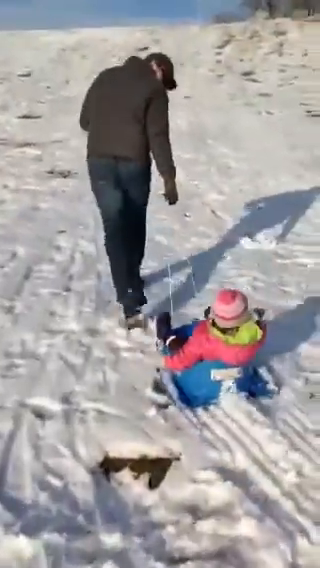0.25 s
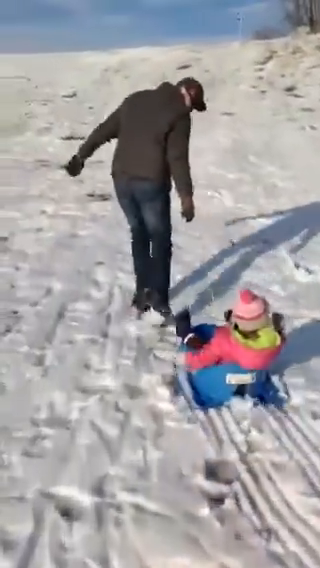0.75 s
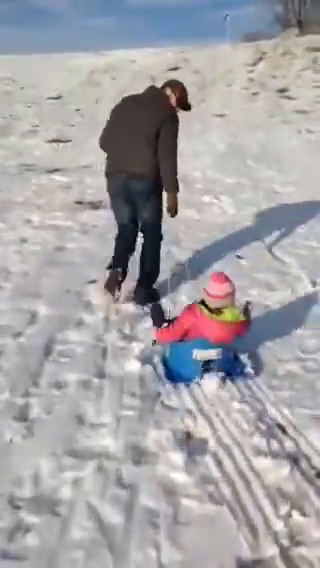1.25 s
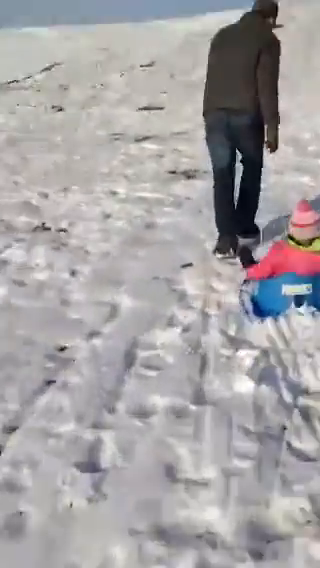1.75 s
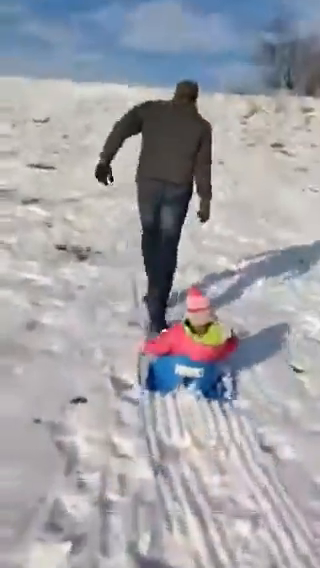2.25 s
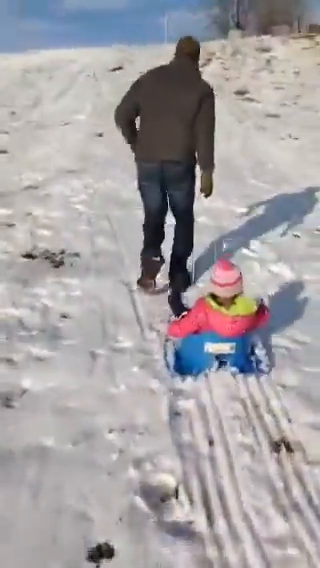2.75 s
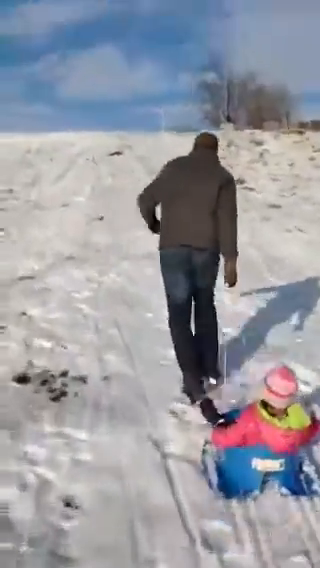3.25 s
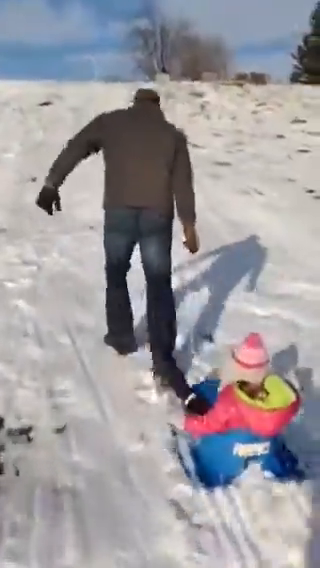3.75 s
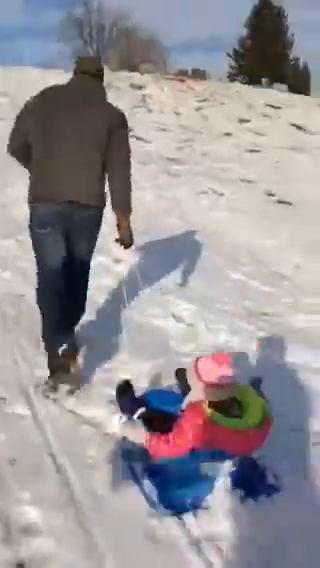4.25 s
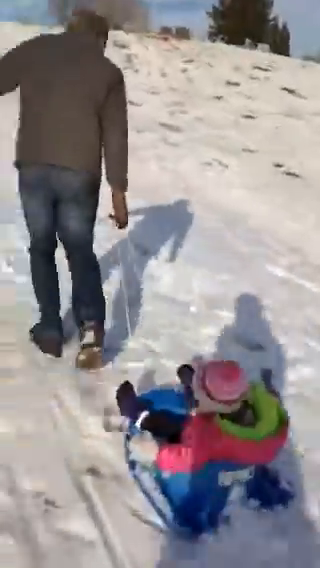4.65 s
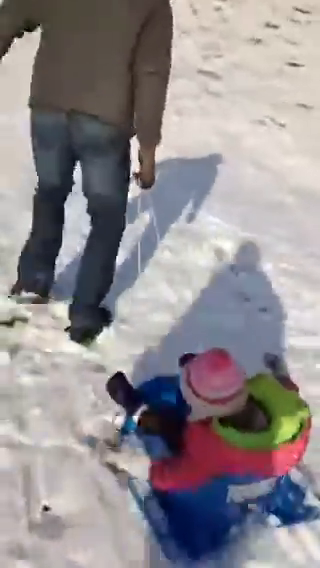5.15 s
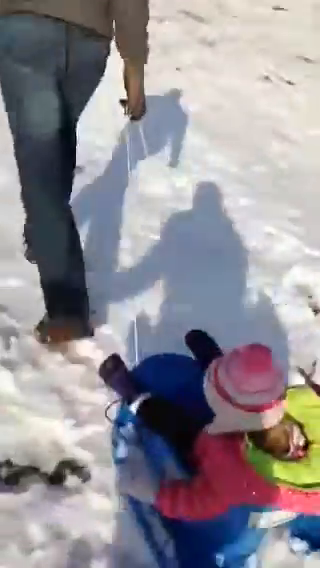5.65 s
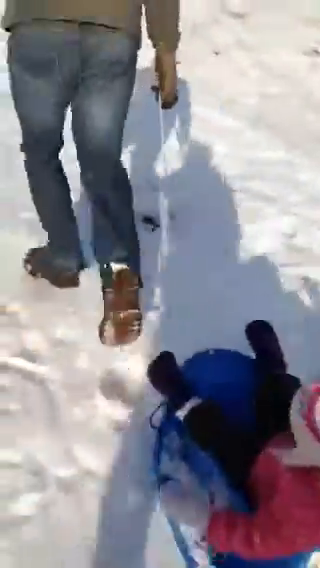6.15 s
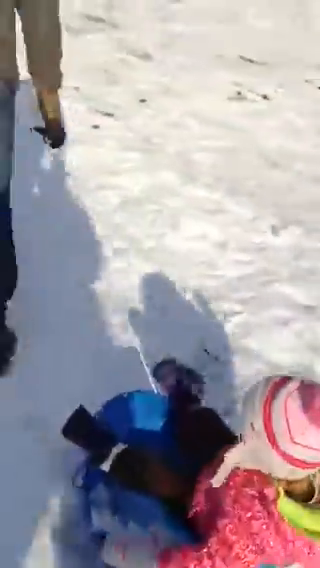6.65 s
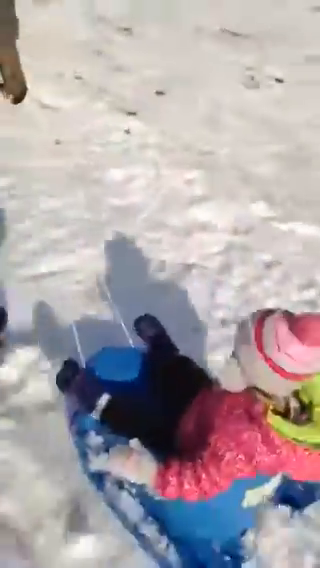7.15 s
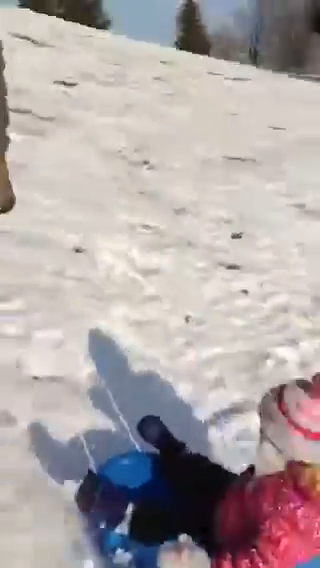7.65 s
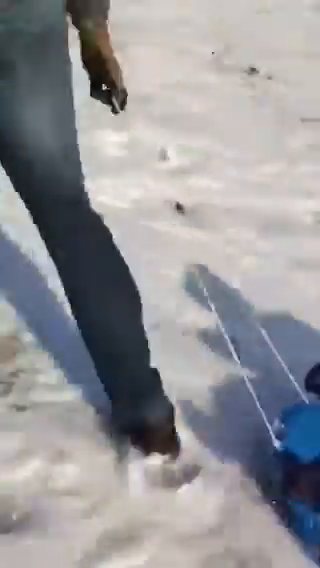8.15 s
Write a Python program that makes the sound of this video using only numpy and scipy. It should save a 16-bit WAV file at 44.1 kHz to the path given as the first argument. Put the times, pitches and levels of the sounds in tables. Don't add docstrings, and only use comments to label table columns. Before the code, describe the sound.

From 0 s a bright, grainy hiss of snow under a sliding plastic sled runs without a break, flickering with small tugs. A short crunch opens it, followed by soft low thuds and rumbling tread. At about 1 s a dull heel strike lands; from 1.5 to 2.7 s it is mostly hiss and hollow scrape with faint bumps. Firm crunching blows with hull knocks come near 2.8-3.0 and 3.6 s, then crusty cracks around 4.0 and 4.7 s. From 5 s the microphone is closer: the hiss swells and the hollow drone recedes. Heavy thuds, sharp crunches and plastic knocks cluster at 5.9, 6.2 and 6.6 s, then dense dull steps from 6.9 to 7.3 s. After 7.5 s the hiss eases slightly, with small crumbling clods and a last couple of boot steps at 8.1-8.4 s. Dry open air, centred handheld microphone, treble slightly limited.

```python
import sys
import numpy as np
from scipy import signal
from scipy.fft import rfft, irfft, next_fast_len
from scipy.io import wavfile
from scipy.ndimage import uniform_filter1d, minimum_filter1d

SR = 44100
rng = np.random.default_rng(int(sys.argv[2]) if len(sys.argv) > 2 else 0)


def voltage_ratio(decibels):
    exponent = np.asarray(decibels, float) / 20
    return 10 ** exponent


def pcm_store(signal):
    levels = np.round(np.clip(np.atleast_2d(signal), -1, 1) * 32767)
    wavfile.write(sys.argv[1], SR, levels.astype(np.int16).T)


N = 371322
T = np.arange(N) / SR


def evened(x):
    return x / np.sqrt(np.mean(x ** 2) + 1e-20)


def bell(u):
    return .5 ** ((2 * u) ** 2)


def add(mix, start_s, sound):
    part = mix[max(round(start_s * SR), 0):][:len(sound)]
    part += sound[:len(part)]


def along(points):
    return np.interp(T, *np.transpose(points))


def swells(table):
    t = np.arange(0, N, 64) / SR
    total = sum(db * bell((t - centre_s) / length_s) for centre_s, db, length_s in table)
    return np.interp(T, t, total)


def coloured(x, points):
    size = next_fast_len(len(x))
    point_hz, point_db = np.transpose(points)
    hz = np.fft.rfftfreq(size, 1 / SR)
    db = np.interp(np.log(hz + 1), np.log(point_hz + 1), point_db)
    return evened(irfft(rfft(x, size) * voltage_ratio(db), size)[:len(x)])


def resonate(x, hz, width_hz):
    turn = np.exp(2j * np.pi * np.cumsum(hz * np.ones(len(x))) / SR)
    r = np.exp(-np.pi * width_hz / SR)
    return 2 * (turn * signal.lfilter([1 - r], [1, -r], x / turn)).real


def wobble(ms):
    span = max(int(ms * SR / 1000), 2)
    return evened(uniform_filter1d(uniform_filter1d(rng.standard_normal(N), span), span))


def crystals(per_s, spread_db):
    size = voltage_ratio(spread_db * np.minimum(rng.exponential(1, N), 5))
    sign = rng.choice([-1., 1.], N)
    return size * sign * (rng.random(N) < per_s / SR)


def patchy(x, patch_db):
    z = signal.stft(x, nperseg=512)[2]
    patches = rng.standard_normal(z.T.shape).T
    patches = uniform_filter1d(uniform_filter1d(patches, size=8, axis=0), size=9, axis=1)
    return evened(signal.istft(z * voltage_ratio(patch_db * evened(patches)), nperseg=512)[1][:N])


def knock(db, hz, cycles, phase):
    half = int(2 * SR * cycles / hz)
    u = np.arange(-half, half) / SR * hz / cycles
    return voltage_ratio(db) * bell(u) * np.cos(2 * np.pi * (cycles * u + phase))


def blows(table, cycles):
    out = np.zeros(N)
    for centre_s, db, hz in table:
        sound = knock(db, hz, cycles, rng.random())
        add(out, centre_s - len(sound) / 2 / SR, sound)
    return out


# time in seconds, cancelled pitch in Hz.
ECHO_DIP = [
    (0.4, 8600),
    (1.2, 7900),
    (2., 7000),
    (5.8, 8500),
]


def ground_echo(x):
    depth = along([(0., 0.43), (3.2, 0.21), (5.3, 0.24), (6.7, 0.13), (7.2, .05)])
    return x - depth * resonate(x, along(ECHO_DIP), 1900.0)


# pitch in Hz, density in dB per Hz.
HISS = [(150, -2), (400, -11), (1000, -6), (2500, -2), (5000, -1), (7500, -1), (10000, -3.5), (16000, -12)]


def hiss():
    return ground_echo(patchy(coloured(crystals(per_s=14000., spread_db=2.0), HISS), patch_db=1.0))


# pitch in Hz, density in dB per Hz.
SPRAY = [(5000, -17.5), (8000, -7), (11000, -1.5), (13500, 1), (16000, -1.5)]


def spray():
    return ground_echo(patchy(coloured(crystals(per_s=16000., spread_db=1.4), SPRAY), patch_db=.5))


# pitch in Hz, width in Hz, level in dB.
HULL = [
    (780, 610, 3),
    (1100, 820, 5),
    (1500, 860, 3.5),
    (1914, 590, 2.5),
]


def drone():
    scrape = crystals(per_s=3000., spread_db=0.0)
    modes = [voltage_ratio(db) * resonate(resonate(scrape, hz, width_hz), hz, width_hz) for hz, width_hz, db in HULL]
    band = signal.butter(6, [680., 2250.], "band", fs=SR, output="sos")
    return evened(signal.sosfilt(band, evened(sum(modes))))


# pitch in Hz, density in dB per Hz.
RUMBLE = [(15, -37), (25, -11), (86, -2), (377, -3.5), (600, -4), (780, -10), (1320, -120)]
# time in seconds, level in dB.
TREAD = [
    (0., 8),
    (.9, 13),
    (1.7, 5),
    (2.4, -5),
    (4.3, 1),
    (5.3, -7),
    (6.1, -5),
    (7.2, -4),
    (7.5, -15),
    (8.42, -10),
]


def rumble(shift_db):
    lumps = resonate(crystals(per_s=160., spread_db=8.5), 85.0, 160.0)
    deep = evened(resonate(lumps, 130.0, 190.0))
    shake = coloured(crystals(per_s=1500., spread_db=2.5), RUMBLE)
    return shake + 0.18 * voltage_ratio(0.5 * shift_db + along(TREAD)) * deep


# time in seconds, hiss in dB, hull load in dB,
# powder in dB, ground shake in dB.
SLIDE = [(0.0, -45, -4.5, -1, -59.5), (0.7, -45, -3, -2, -56), (1.75, -47, -3, 1, -58),
         (1.95, -46, -0.5, 0.5, -63.5), (2.45, -46, 3, 1.5, -59.5), (2.75, -45.5, 1, 1, -57),
         (3.27, -43.5, 2.5, 0.5, -53.5), (3.33, -45, 0, 1.5, -59), (4.1, -43, -1.5, 0.5, -54),
         (5.0, -40.5, -13.5, 0.5, -57.5), (5.4, -37.5, -10, -2, -52), (5.7, -38, -11.5, -0.5, -54.5),
         (6.3, -38, -12, 1, -56), (6.8, -38, -4.5, 2.5, -42), (7.25, -38.5, -5, 2.5, -43.5),
         (7.5, -37, -9.5, 1.5, -58), (8.1, -41, -2.5, 4.5, -42.5), (8.42, -41.5, 0.5, -1, -59)]
# centre in seconds, change in dB, length in seconds.
TUGS = [(0.21, 2, 0.076), (0.48, -2.5, 0.12), (0.75, -2, 0.055), (0.96, -2, 0.064), (1.12, 3, 0.086),
        (1.34, -0.5, 0.38), (1.47, 1.5, 0.076), (1.54, 1, 0.04), (2.01, -1.5, 0.063), (2.11, 2.5, 0.076),
        (2.49, -0.5, 0.056), (2.61, 2, 0.037), (3.31, -3.5, 0.065), (3.41, 1, 0.07), (2.85, 1.5, 0.055),
        (3.12, -1, 0.077), (3.63, 1.5, 0.072), (3.83, -0.9, 0.13), (4.2, 1, 0.2), (4.77, 1, .06),
        (5.13, -1, .06), (5.22, -0.8, 0.14), (5.31, -1.5, 0.066), (5.52, -1.5, 0.04), (5.9, -2.5, 0.07),
        (6.09, 1.3, 0.32), (6.46, 3, 0.07), (6.64, -0.5, 0.17), (6.74, 2.5, 0.065), (6.8, 2.5, 0.12),
        (6.99, -1, 0.055), (7.17, 3.5, 0.059), (7.3, 1.5, 0.14), (7.53, -2, 0.09), (7.63, 0.5, .08),
        (7.71, 2, 0.055), (7.84, -1.5, 0.042), (8.0, 2.5, 0.088), (8.16, 1.5, 0.057), (8.3, -0.5, 0.099)]
# centre in seconds, change in dB,
# length in seconds.
JOLTS = [(0.57, 4.5, 0.046), (1.14, 1, 0.04), (1.0, 3.5, 0.073), (1.44, 3, 0.044), (1.71, 2, 0.066),
         (2.1, 1, 0.15), (2.81, 1, 0.04), (2.96, 1.5, 0.032), (3.61, 3, 0.062), (3.97, 4, 0.1),
         (3.84, 1, 0.14), (4.66, 6, 0.16), (4.77, 4, 0.12), (5.15, 1, 0.11), (5.44, 5, 0.097),
         (5.87, 7.5, 0.066), (6.2, 9, 0.063), (6.43, -9, 0.032), (6.58, -1, 0.046), (6.7, -12, 0.033),
         (6.89, -2, 0.033), (7.05, -2, 0.045), (7.83, -1, 0.063), (7.25, -2, 0.027), (7.99, 1.5, 0.058),
         (8.29, 2, 0.16)]
# centre in seconds, change in dB, length in seconds.
SHIFTS = [(0.3, -0.5, .15), (0.44, -5, .07), (0.73, -3, 0.059), (0.83, 0, 0.07), (1.31, -2, 0.14),
          (1.45, 1.5, .07), (1.56, 3.5, 0.084), (1.99, 1, .12), (2.19, 10, 0.047), (2.4, 3, 0.15),
          (3.1, -1, .12), (3.45, -2, 0.082), (3.73, 2.5, 0.24), (4.1, 5, 0.04), (4.85, -7, .08),
          (4.98, 6, .1), (5.2, -3, .12), (5.34, -8, .08), (5.47, -7, 0.1), (5.65, -1, .12),
          (5.97, -9, 0.047), (6.1, -2, .1), (6.28, 11, 0.08), (6.45, 7, 0.052), (6.85, -8, 0.09),
          (7.0, -11.5, 0.17), (7.5, 9.5, 0.16), (7.85, 3, 0.065), (8.0, -9, 0.13), (8.08, -5, 0.071),
          (8.4, 2, 0.091)]


def sled():
    s, *columns = np.transpose(SLIDE)
    slide_db, load_db, powder_db, shake_db = (np.interp(T, s, c) for c in columns)
    tug_db, jolt_db, shift_db = swells(TUGS), swells(JOLTS), swells(SHIFTS)
    hiss_db = slide_db + tug_db
    spray_db = slide_db + powder_db + 0.91 * tug_db
    drone_db = slide_db + load_db + 0.4 * tug_db + 1.41 * jolt_db
    rumble_db = shake_db + 0.28 * tug_db + 0.89 * jolt_db + shift_db
    chatter = 0.68 * wobble(ms=33.0) + 0.74 * wobble(ms=15.0)
    return (hiss() * voltage_ratio(hiss_db + 2.0 + 0.65 * chatter)
            + spray() * voltage_ratio(spray_db + 3.0 + 0.56 * chatter)
            + drone() * voltage_ratio(drone_db - 6.5 + 1.05 * chatter)
            + rumble(shift_db) * voltage_ratio(rumble_db - 1.0 + 2.06 * chatter + 3.2 * wobble(ms=93.0)))


# start in seconds, peak in dB, colour in Hz.
CRUNCHES = [(0.001, -34.5, 1180), (0.595, -50, 1400), (1.455, -46, 1500), (2.803, -31.5, 2200),
            (3.9305, -32, 1370), (3.997, -33.5, 4000), (4.677, -28, 4500), (4.741, -33, 2200),
            (5.04, -32, 3030), (5.7189, -31.5, 3020), (5.855, -36, 2200), (5.861, -27, 3100),
            (6.089, -43, 2610), (6.186, -23, 2300), (6.217, -29, 1900), (6.38, -37, 2490),
            (6.553, -23.5, 2900), (6.578, -29, 2200), (6.599, -29, 3550), (6.621, -28, 2400),
            (6.788, -28.5, 2980), (6.887, -27, 3000), (7.243, -36, 1500), (7.434, -41, 4160),
            (7.58, -31, 2680), (7.76, -32, 2840), (7.952, -34, 4200), (7.963, -42, 2520),
            (8.223, -29.5, 1800)]


def crust():
    out, snaps, decay_s = np.zeros(N), crystals(per_s=11000.0, spread_db=-1.5), 0.013
    wide = coloured(snaps, [(300, -14), (800, 9.0), (1800, 3.0), (3500, 4.5), (8000, -9), (16000, -13)])
    for start_s, db, hz in CRUNCHES:
        u = np.arange(int(4 * decay_s * SR)) / SR / decay_s
        at = min(round(start_s * SR), N - len(u))
        ring = evened(resonate(snaps[at:at + len(u)], hz, .5 * hz))
        clump = wide[at:at + len(u)] / np.std(wide[at:at + len(u) // 4])
        burst = (1 - np.exp(-u * 7.9)) * np.exp(-u * 1.54)
        add(out, start_s, voltage_ratio(db - 6.0) * burst * (0.96 * clump + 0.72 * ring))
    return out


# centre in seconds, peak in dB, pitch in Hz.
THUDS = [(0.035, -59, 85), (0.076, -59, 90), (0.113, -46.0, 103), (0.15, -40, 86), (0.179, -45, 102),
         (0.225, -43.5, 87), (0.278, -44, 80), (0.311, -54, 79), (0.348, -44, 83), (0.398, -46, 84),
         (0.492, -50, 79), (0.56, -49, 100), (0.627, -45, 101), (0.67, -52, 91), (0.692, -60, 76),
         (0.747, -44, 76), (0.77, -51, 95), (0.81, -43, 81), (0.853, -42, 78), (1.054, -56, 76),
         (1.102, -56, 76), (1.148, -51, 73), (1.191, -50.0, 94), (1.229, -50, 84), (1.35, -48, 66),
         (1.377, -51.5, 86), (1.424, -49.5, 78), (1.455, -50.5, 97), (1.55, -44, 73), (1.581, -54, 90),
         (1.618, -52, 77), (1.647, -51.5, 83), (1.845, -41, 84), (1.892, -57, 83), (2.176, -42, 93),
         (2.226, -52.0, 76), (2.462, -48, 89), (2.582, -47, 93), (2.706, -50, 67), (2.744, -54, 86),
         (2.855, -45, 77), (2.81, -43, 150), (3.04, -43, 170), (3.25, -38, 94.5), (3.4, -50.5, 76),
         (3.481, -46, 81), (3.502, -54, 79), (3.801, -50, 80), (3.829, -44, 85), (3.9, -44, 84),
         (3.984, -41, 82), (4.048, -45, 80), (4.124, -50, 77), (4.209, -56, 86), (4.251, -47, 78),
         (4.338, -44, 86), (4.365, -48, 86)]
# centre in seconds, peak in dB, pitch in Hz.
NEAR_THUDS = [(4.433, -41, 70), (4.508, -43, 79), (4.529, -47, 91), (4.549, -46, 85), (4.588, -45, 92),
              (4.62, -47.0, 74), (4.667, -42, 86), (4.73, -53, 79), (4.928, -39, 82), (4.958, -48, 78),
              (4.985, -47, 72), (5.054, -48, 80), (5.36, -41, 190), (5.603, -38, 190), (5.599, -31.5, 69),
              (5.645, -35, 100), (5.7, -44, 55), (5.765, -37, 135), (5.846, -32, 87), (5.871, -40, 55),
              (5.902, -46, 73), (5.982, -47, 84), (6.031, -38, 94), (6.067, -37, 85), (6.09, -34, 55),
              (6.125, -31, 55), (6.13, -30.5, 118), (6.188, -29.0, 75), (6.264, -36, 79), (6.3, -37, 90),
              (6.334, -30, 89), (6.361, -36, 88), (6.401, -36.5, 88), (6.483, -45, 94), (6.532, -45, 91),
              (6.581, -25.5, 76.5), (6.606, -46, 98), (6.646, -32, 85), (6.71, -30, 86), (6.752, -26.5, 72),
              (6.74, -28.5, 120), (6.815, -47, 76), (6.841, -44, 56), (6.868, -48, 73), (6.963, -47, 92),
              (7.11, -29.5, 85), (7.16, -34, 85), (7.202, -42, 77), (7.225, -31, 89), (7.286, -44.5, 83),
              (7.322, -50, 94), (7.603, -48, 74), (7.68, -44.5, 89), (7.816, -41, 83), (7.855, -46.0, 76),
              (8.101, -45, 92), (8.19, -34, 86)]


def thuds():
    return blows(THUDS, cycles=0.82) + blows(NEAR_THUDS, cycles=0.82)


# centre in seconds, peak in dB, pitch in Hz.
CLODS = [(0.195, -49, 256), (0.553, -42, 255), (1.045, -47, 231), (1.062, -42, 219), (1.103, -44, 203),
         (1.458, -41, 297), (1.595, -44, 180), (2.171, -45, 181), (2.805, -35, 480), (2.83, -49, 256),
         (2.968, -42, 240), (3.172, -47, 225), (3.441, -43.5, 207), (3.585, -36, 270), (3.89, -46, 190),
         (3.915, -45, 223), (3.955, -48, 286), (4.006, -34, 316), (4.073, -42.0, 303), (4.102, -45, 248),
         (4.582, -42, 285), (4.691, -40, 236), (4.765, -45, 205), (5.051, -44, 291), (5.136, -42, 226),
         (5.247, -41, 207), (5.467, -34, 200), (5.767, -44, 189), (5.896, -38, 245), (5.919, -39.0, 244),
         (6.016, -40, 240), (6.261, -39, 197), (6.38, -40, 220), (6.498, -35, 263), (6.56, -41, 205),
         (6.711, -40, 196), (6.744, -38, 229), (6.907, -35, 280), (6.92, -35, 350), (6.949, -33, 270),
         (7.025, -31, 250), (7.08, -38.0, 244), (7.148, -39, 190), (7.166, -41, 189), (7.195, -37.0, 230),
         (7.308, -37, 233), (7.399, -35.5, 224), (7.612, -38, 210), (7.814, -42, 212), (7.847, -35, 218),
         (7.887, -40, 223), (7.956, -36, 231), (8.053, -36, 241), (8.077, -42, 231), (8.105, -40, 194),
         (8.159, -39.5, 215), (8.287, -39.5, 287), (8.303, -37, 198)]


def clods():
    return blows(CLODS, cycles=1.23)


# centre in seconds, peak in dB, pitch in Hz.
TAPS = [(0.335, -47.5, 204), (2.82, -40.5, 297), (3.558, -47, 201), (5.435, -41, 434), (6.195, -28, 810),
        (6.224, -34, 1260), (6.435, -41, 800), (6.186, -41, 600), (6.559, -34, 784), (6.59, -35, 786),
        (6.896, -32, 1310), (7.02, -37, 298)]


def rim_taps():
    return blows(TAPS, cycles=6.1)


# centre in seconds, peak in dB, pitch in Hz.
HEELS = [(0.534, -35, 184), (0.601, -36.5, 270), (0.968, -27, 204), (1.154, -41, 238), (1.616, -35.5, 178),
         (2.816, -42, 318), (2.961, -21.5, 300), (3.225, -41, 238), (3.259, -39, 219), (3.557, -36, 189),
         (3.568, -25.5, 207), (3.576, -32.5, 326), (3.903, -37, 208), (4.227, -37, 252),
         (4.742, -32.5, 179), (5.422, -35, 330), (5.475, -29.5, 260), (5.878, -36, 250), (6.19, -32, 228),
         (6.579, -28, 226), (6.677, -23, 160), (6.731, -35, 220), (6.963, -32, 235), (7.095, -31, 194),
         (7.222, -24.5, 235), (7.247, -20.5, 275), (7.257, -23, 200), (7.869, -34, 235), (8.137, -23, 186),
         (8.226, -27.5, 180), (8.375, -32, 225)]


def heels():
    return blows(HEELS, cycles=1.09)


# centre in seconds, peak in dB, pitch in Hz.
KNOCKS = [(0.56, -36, 1050), (0.568, -47, 900), (0.6, -36, 775), (1.457, -43, 880), (2.808, -31.5, 975),
          (2.957, -28, 700), (3.255, -34, 1080), (3.569, -33.5, 477), (4.005, -40, 1100), (4.68, -32, 780),
          (4.741, -36, 1000), (5.860, -38, 900), (5.869, -32, 800), (6.182, -26, 1040), (6.189, -26, 960),
          (6.218, -34, 960), (6.556, -39, 950), (6.58, -28, 800), (6.594, -36, 815), (6.885, -29, 950),
          (7.272, -27, 1450)]


def hull_knocks():
    return blows(KNOCKS, cycles=1.32)


# centre in seconds,
# level in dB, length in seconds, colour in Hz.
SCUFFS = [(.57, -54, 0.046, 1300), (1.6, -61, .2, 13900), (1.98, -53, 0.15, 1900), (3.97, -49, .03, 1600),
          (2.605, -56, 0.17, 1070), (2.816, -46, 0.035, 1300), (3.254, -51, .06, 900),
          (3.622, -51, .04, 1750), (4.682, -40, .007, 2300), (4.76, -52, .05, 2200),
          (6.58, -45.5, 0.066, 784), (5.87, -42, .018, 1780), (5.866, -44, .01, 5200),
          (6.185, -36, .006, 3400), (6.189, -41, 0.014, 1710), (6.426, -43, 0.1, 2300),
          (7.04, -41, .02, 3730), (7.049, -41, 0.01, 2500), (7.967, -43, 0.054, 2420),
          (8.015, -48, .03, 2300), (8.048, -44, .025, 2200)]


def scuffs():
    out, snaps = np.zeros(N), crystals(per_s=3000.0, spread_db=-0.5)
    for centre_s, db, length_s, hz in SCUFFS:
        half = int(length_s * SR)
        u = np.arange(-half, half) / SR / length_s
        at = round((centre_s - length_s) * SR)
        width_hz = 0.45 * hz
        ring = resonate(resonate(snaps[at:at + len(u)], hz, width_hz), hz, width_hz)
        add(out, at / SR, voltage_ratio(db) * bell(u) * evened(ring))
    return out


def scene():
    mono = sled() + crust() + thuds() + clods() + rim_taps() + heels() + hull_knocks() + scuffs()
    return np.array([mono, mono])


def slotted(x, share):
    hz, _, z = signal.stft(x, SR, nperseg=2048, noverlap=1536)
    chance = share * np.clip((hz[:, None] - 4000) / 10000, 0, 1)
    seeds = rng.random(z.T.shape).T < chance
    keep = minimum_filter1d(minimum_filter1d(1. - seeds, size=4, axis=0), size=4, axis=1)
    return signal.istft(z * np.maximum(keep, .05), SR, nperseg=2048, noverlap=1536)[1][:N]


# centre in seconds, count of bands.
FILLS = [(0.494, 2), (0.818, 1), (0.866, 1), (0.91, 1), (1.538, 3), (1.588, 1), (1.96, 1), (2.004, 1),
         (2.281, 4), (2.375, 4), (2.886, 2), (3.305, 3), (3.49, 1), (3.513, 2), (3.537, 1), (3.629, 1),
         (3.653, 1), (3.721, 1), (3.907, 2), (4.185, 1), (4.326, 4), (4.475, 2), (4.604, 1), (5.186, 2),
         (5.463, 2), (5.694, 1), (6.324, 1), (6.415, 1), (7.552, 1), (7.717, 3)]


def fills(mid):
    low_hz, top_hz, wide_hz, band_count = 4100, 15300, 1400, 8
    side, block = np.zeros(N), signal.windows.hann(2048)
    hz = np.fft.rfftfreq(len(block), 1 / SR)
    band_of = (hz - low_hz) // wide_hz
    for centre_s, count in FILLS:
        at = round(centre_s * SR) - len(block) // 2
        chosen = np.isin(band_of, rng.permutation(band_count)[:count]) * (hz < top_hz)
        band = rfft(mid[at:at + len(block)]) * chosen
        scrambled = irfft(band * np.exp(2j * np.pi * rng.random(len(hz))))
        add(side, at / SR, voltage_ratio(-.4) * block * scrambled)
    return side


def low_pass(x):
    return signal.sosfilt(signal.butter(12, 16550, fs=SR, output="sos"), x)


def record(dry):
    cut = signal.sosfilt(signal.butter(3, 42., "high", fs=SR, output="sos"), dry[0])
    edge = signal.firwin(2047, 15310, window=("kaiser", 10), fs=SR)
    mid = slotted(signal.oaconvolve(cut, edge, "same"), share=.003)
    side = fills(mid)
    return low_pass(np.array([mid + side, mid - side]))


dry = scene()
out = record(dry)
pcm_store(out)
```